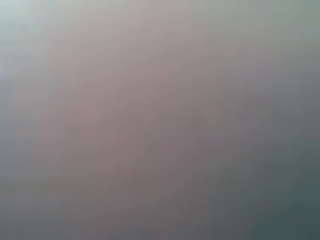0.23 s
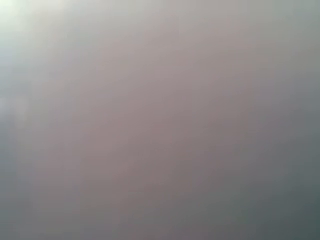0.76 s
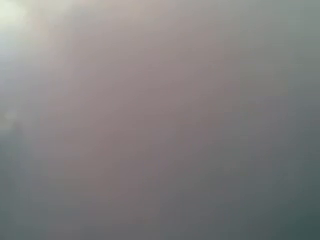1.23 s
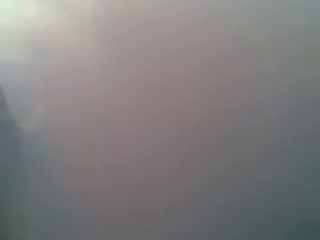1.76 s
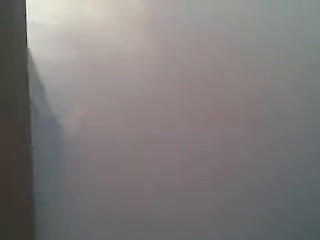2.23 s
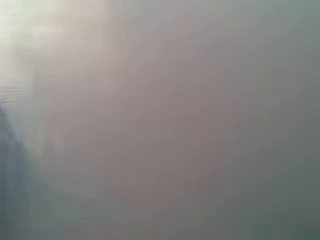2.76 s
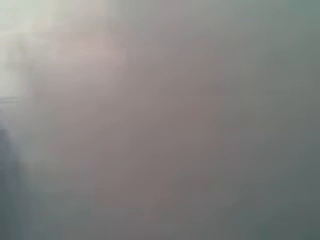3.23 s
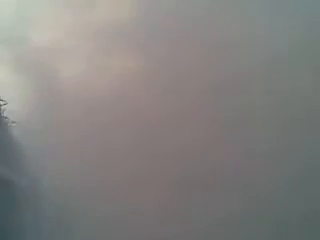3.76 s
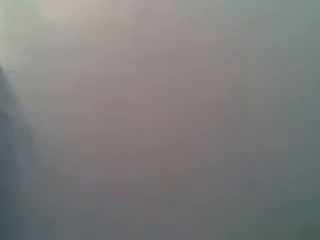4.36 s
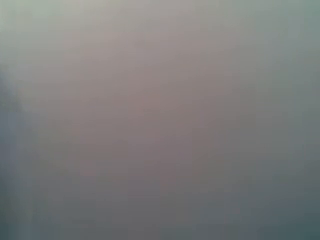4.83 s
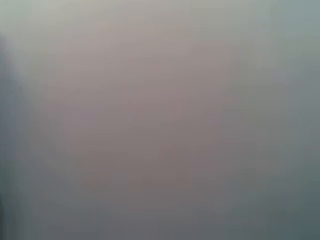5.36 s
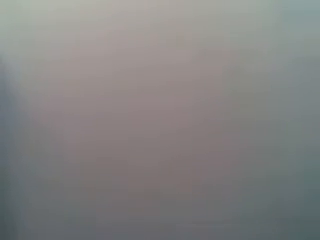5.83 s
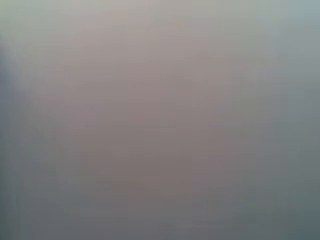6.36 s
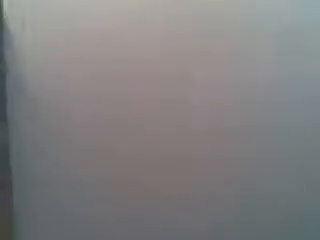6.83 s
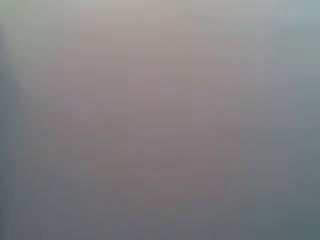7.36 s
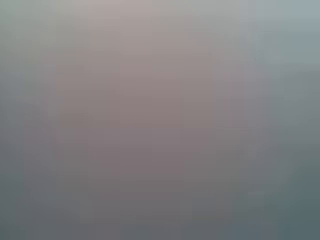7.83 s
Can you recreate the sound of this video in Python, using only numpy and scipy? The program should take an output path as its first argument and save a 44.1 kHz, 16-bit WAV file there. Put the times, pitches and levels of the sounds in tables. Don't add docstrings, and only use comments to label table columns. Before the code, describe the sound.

Very close, loud string of firecrackers outdoors between hard walls. Cracks come several per second, unevenly, sometimes in tight sputters, sometimes with small gaps. The overloaded microphone makes every blast a gritty, clipped blare, with a rough pitch that stumbles and slides down before cutting out. Reverberant tails and low street noise fill the gaps, then the crackle becomes nearly continuous and is still going at the finish.

```python
import sys
import numpy as np
from scipy import signal
from scipy.io import wavfile
from scipy.ndimage import uniform_filter1d

SR = 44100
rng = np.random.default_rng(int(sys.argv[2]) if len(sys.argv) > 2 else 0)


def persist_wave(psi):
    counts = np.round(np.clip(psi, -1, 1) * 32767).astype(np.int16)
    wavfile.write(sys.argv[1], SR, np.atleast_2d(counts).T)


def ratio(d):
    e = np.asarray(d, float) / 20
    return 10 ** e


N = 356769

# f/Hz, density/dB per Hz
FLOOR_SPECTRUM = [(18, -47), (30, -19), (161, 4), (721, -6), (1250, -4.5), (7090, -24), (11700, -40),
                  (16000, -61)]
# f/Hz, t60/s
WALL_T60 = [(100, 0.42), (1000, 0.26), (4000, 0.26), (8000, 0.2), (15000, 0.28)]
# f/Hz, t60/s
ROLL_T60 = [(100, 1.9), (1000, 1.15), (6000, 1.03), (11000, 0.64), (15000, 1.2)]
# f/Hz, level/dB
WALL_COLOUR = [(300, -2), (1500, -2.5), (4000, -1), (12000, 0)]
# f/Hz, level/dB
STREET_COLOUR = [(30, -12.5), (150, -7), (600, 0), (1500, -1.5), (2100, -4), (3000, -13), (5000, -14.5),
                 (7200, -14.5), (8600, -16.5), (13000, -24), (17000, -41)]
# t/s, level/dB
SMALL_POPS = [
    (2.803, -41),
    (2.76, -50),
    (6.5, -46),
    (0.28, -38),
]
# t/s, level/dB, overload/s, slowing share/0-1, halt level/full scale
HALTING_BANGS = [(.218, -3.5, .097, .4, 0.49), (.5341, -4, 0.086, 0.52, 0.23), (.6685, -5, 0.088, 0.52, 0.43),
                 (.9124, -28, .028, 0.6, 0.56), (1.194, -11.5, 0.047, .72, 0.46),
                 (1.4448, -1.5, 0.13, .6, 0.52), (1.6802, -4, 0.098, 0.67, 0.55),
                 (2.5842, -11.5, 0.048, 0.69, .36), (2.9724, -.5, .106, .4, .48),
                 (4.5797, -7, 0.088, .75, 0.29), (4.6742, -10.5, .04, .24, 0.46), (4.7632, 2, .1, 0.1, 0.21),
                 (4.9775, -6, 0.057, .57, 0.3), (7.328, -18, .031, .1, .2), (7.3929, .5, 0.11, 0.32, .53),
                 (0.028, -9.5, 0.039, 0.38, -0.43), (0.345, -4, .078, 0.51, -0.45),
               (1.0751, -5.5, .083, .7, -0.056), (1.249, -9, 0.073, 0.9, -0.24),
               (1.789, -7.5, 0.05, 0.2, -0.26), (1.9618, -1.5, 0.088, .28, -.33),
               (2.2283, -5.5, 0.065, .24, -0.36), (2.352, -11, 0.034, 0.22, -.45),
               (2.425, -12, 0.057, 0.87, -0.5), (3.1844, -3, 0.08, 0.29, -0.49),
               (3.3491, -3.5, 0.12, 0.5, -0.32), (3.4898, -5, 0.08, .38, -.34),
               (3.6133, -10.5, 0.045, 0.71, -.42), (3.9683, -10.5, 0.035, 0.44, -.33),
               (4.2393, -11, .062, .55, -0.58), (4.4, -5.5, 0.086, .6, -0.38),
               (5.1805, -8.5, 0.039, 0.18, -.18), (5.273, -4.5, 0.08, 0.23, -.34),
               (5.495, -5.5, .09, .64, -.5), (5.6519, -8.5, .078, 0.81, -0.36),
               (5.8866, -11.5, .071, .7, -.2), (6.3484, -14, 0.055, .45, -0.51),
               (6.7858, -9.5, .084, 0.88, -0.62), (7.142, -9.5, 0.064, .56, -0.54)]
# t/s, level/dB, overload/s
OVERTAKEN_BANGS = [(0, -23, .042), (0.4397, -9.5, 0.058), (.5019, -3, 0.054), (0.893, -12, 0.041),
                   (1.9243, -12, 0.043), (2.192, -7.5, 0.032), (2.494, -4, 0.1), (3.087, -6.5, 0.087),
                   (3.127, -4, 0.11), (3.3238, -8, 0.045), (3.6695, -6, 0.092), (3.7098, -1.5, .09),
                   (3.76, -4.5, 0.13), (3.829, -15.5, .035), (3.8578, -8, 0.047), (3.8868, -4.5, 0.15),
                   (4.1406, 2.5, 0.19),
                   (5.0702, -2, 0.09), (5.1616, -9.5, 0.047), (5.427, -4.5, .074), (5.59, -3, .12),
                 (5.9936, -10, .032), (6.0114, -5.5, 0.078), (6.0675, -3.5, .047), (6.093, -18, .039),
                 (6.116, -10.5, 0.062), (6.1605, -3.5, .1), (6.259, -11, .084), (6.7368, -6, 0.066),
                 (6.95, -3, 0.092), (7.035, -5.5, 0.076), (7.066, -2.5, 0.12), (7.209, -1, .105),
                 (7.2887, -8.5, 0.061), (7.512, -3, .069), (7.5774, 1, .17), (7.65, -9, 0.073),
                 (7.7352, -5, 0.083), (7.778, -3.5, 0.14), (7.864, -5.5, 0.07), (7.923, -9.5, .045),
                 (7.9545, -6, 0.08), (7.991, -1, .19), (8.0679, -3, 0.062)]
# t/s, length/s
LONG_CATCHES = [(.352, 0.0045), (0.367, 0.0049), (1.214, 0.0042), (1.726, .005), (1.739, .006),
                (1.933, 0.0067), (1.971, .0056), (2.222, .004), (2.551, .005), (3.032, 0.012),
                (3.835, 0.0029), (3.849, 0.0031), (4.681, 0.0046), (7.497, 0.0089)]
# f/Hz, level/dB
OUTPUT_COLOUR = [(20, -2.5), (1800, 0.5), (3000, -1), (7500, 6), (10000, -3), (15000, -6.5)]

RAIL = 0.7


def evened(x):
    return x / np.sqrt(np.mean(x ** 2) + 1e-20)


def read(points, hz):
    f, value = np.transpose(points)
    return np.interp(np.log(hz + 1), np.log(f + 1), value)


def coloured(x, points):
    hz = abs(np.fft.fftfreq(4096, 1 / SR))
    log_gain = np.log(ratio(read(points, hz)))
    phase = -signal.hilbert(log_gain).imag
    taps = np.fft.ifft(np.exp(log_gain + 1j * phase)).real[:2048]
    return signal.oaconvolve(x, taps)[:len(x)]


def wander(hz):
    lowpass = signal.butter(2, hz, fs=SR, output="sos")
    return evened(signal.sosfilt(lowpass, rng.standard_normal(N)))


def street():
    noise = evened(coloured(rng.standard_normal(N), FLOOR_SPECTRUM))
    swell = ratio(2.0 * wander(28))
    return ratio(-38.5) * noise * swell


def bangs():
    slowing_share = 0.64
    overtaken = [(*row, slowing_share, 0) for row in OVERTAKEN_BANGS]
    return sorted(HALTING_BANGS + overtaken)


def echo(far_db, clumps_db, build_s):
    hz, t, noise = signal.stft(rng.standard_normal((2, SR)), SR, nperseg=128)
    near = ratio(read(WALL_COLOUR, hz)[:, None] - 60 * t / read(WALL_T60, hz)[:, None])
    near *= 1 + 0.28 * np.exp(-((t - 0.028) / 0.011) ** 2)
    far = ratio(far_db - 60 * t / read(ROLL_T60, hz)[:, None])
    clumps = ratio(clumps_db * evened(uniform_filter1d(rng.standard_normal(len(t)), size=3)))
    mixed = noise[0] * near * clumps + noise[1] * far
    tail = signal.istft(mixed, SR, nperseg=128)[1][:SR]
    tail *= 1 - 0.5 * np.exp(-np.arange(SR) / SR / build_s)
    shock_s = 0.0004
    u = np.arange(200) / SR / shock_s
    tail[:200] += 6.1 * (1 - u) * np.exp(-u)
    return tail


def crackers():
    out = np.zeros(N)
    rows = [row[:2] for row in bangs()] + SMALL_POPS
    for k in range(4):
        clicks = np.zeros(N)
        for start_s, level_db in rows[k::4]:
            clicks[round(start_s * SR)] = ratio(level_db)
        pattern = echo(far_db=-26, clumps_db=2.5, build_s=0.00041)
        out += signal.fftconvolve(clicks, pattern)[:N]
    return coloured(out, STREET_COLOUR) * ratio(13.5)


def scene():
    return (street() + crackers())[None]


def bias_speed(t):
    run_hz, usual_s, haste = 1289.3, 0.08, 0.15
    weak_db, weak_loss_per_db, slowest = -13, 0.16, 0.5
    catches_per_s, catch_s = 10, 0.0032
    speed = np.zeros(N)
    for start_s, level_db, length_s, slowing, _ in bangs():
        drive = np.clip(1 + weak_loss_per_db * (level_db - weak_db), slowest, 1)
        hz = run_hz * (usual_s / length_s) ** haste * drive
        span = slice(round(start_s * SR), round((start_s + length_s) * SR))
        since_s = t[span] - start_s
        left = 1 - since_s / length_s
        slow_down = np.minimum(1, left / slowing) ** 1.05
        spin_up = np.minimum(1, 0.4 + since_s / 0.02)
        speed[span] = np.maximum(speed[span], 1.25 * hz * slow_down * spin_up)
    for start_s, length_s in LONG_CATCHES:
        speed[round(start_s * SR):round((start_s + length_s) * SR)] *= 0.1
    hits = rng.random(N) < catches_per_s / SR
    caught = np.convolve(hits, np.ones(round(catch_s * SR)))[:N]
    speed[caught > 0] *= 0.1
    return speed


def bias(stumble, stumble_hz, drain_s):
    creep_hz = 350.8
    t = np.arange(N) / SR
    speed = bias_speed(t)
    lurch = wander(stumble_hz)
    lurch = stumble * (lurch - 0.8 * uniform_filter1d(lurch, size=900))
    pace = np.sqrt(speed * 1404.0) * np.minimum(1, speed / creep_hz)
    travel = np.cumsum(speed + lurch * pace) / SR
    turns, start = travel.copy(), None
    ending = (N / SR - 1, 0, 1 - 1 / SR, 1, 1)
    for start_s, _, length_s, _, stuck in bangs() + [ending]:
        if start is None:
            start = round(start_s * SR)
        if stuck:
            halt = round((start_s + length_s) * SR)
            zero = 0.5 + np.sign(stuck) / 4
            over = abs(stuck) / (4 * RAIL)
            turns[start:halt] = travel[start:halt] - travel[halt] + zero + over
            turns[halt:] = zero + over * np.exp(-((t[halt:] - t[halt]) / drain_s) ** 1.6)
            start = None
    return turns


def roll_off(x):
    return signal.sosfilt(signal.butter(12, 16660, fs=SR, output="sos"), x)


def record(dry):
    limit, edge_hz = 0.83, 15800
    turns = bias(stumble=0.4604, stumble_hz=250.9, drain_s=0.013)
    turns = turns + dry[0] / (4 * RAIL)
    folded = RAIL * (4 * abs(turns % 1 - 0.5) - 1)
    out = coloured(folded, OUTPUT_COLOUR) * ratio(1.5)
    out = limit * out / (limit ** 4 + out ** 4) ** (1 / 4)
    out = signal.oaconvolve(out, signal.firwin(255, edge_hz, fs=SR), "same")
    return roll_off(out[None])


dry = scene()
out = record(dry)
persist_wave(out)
```